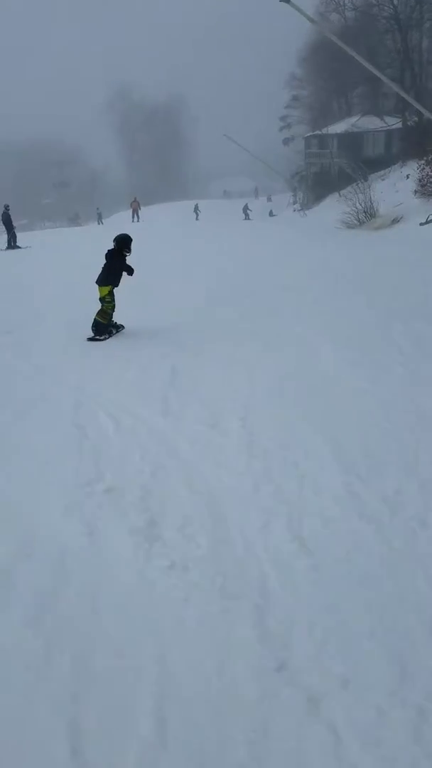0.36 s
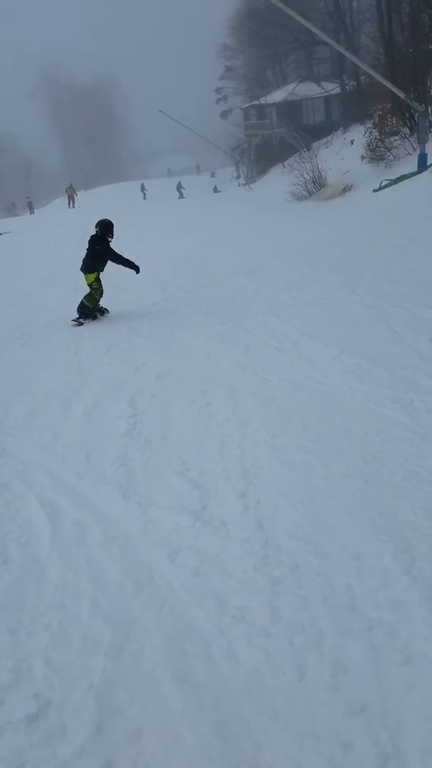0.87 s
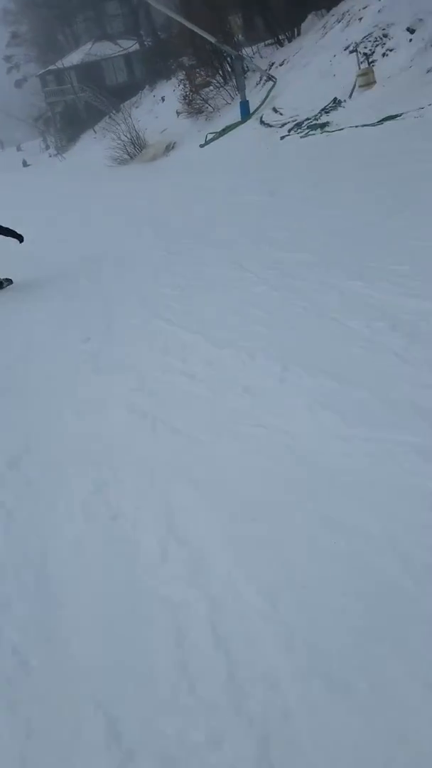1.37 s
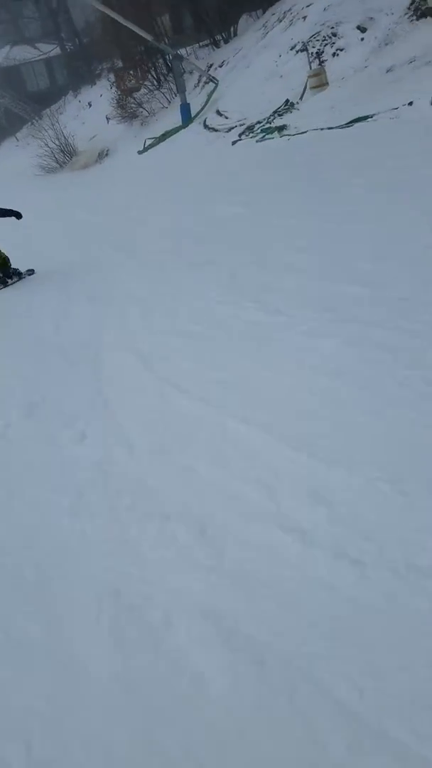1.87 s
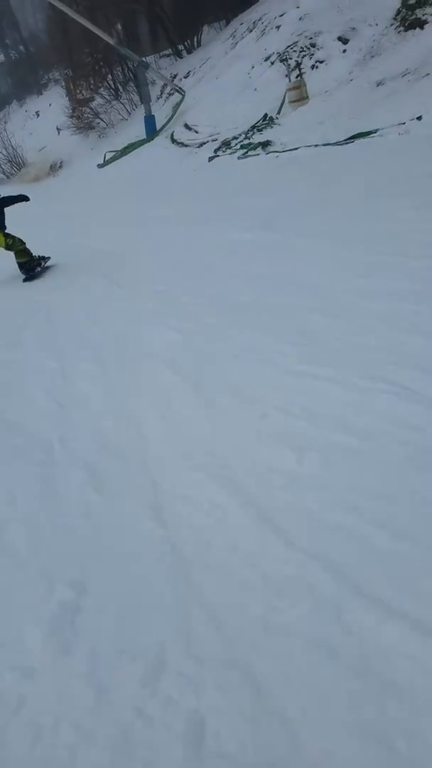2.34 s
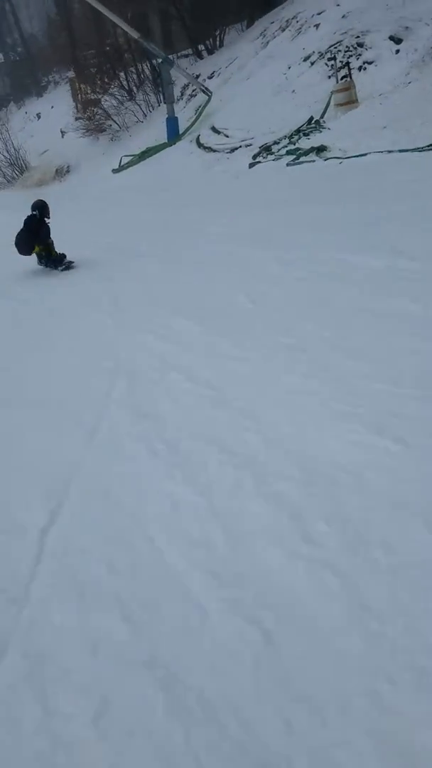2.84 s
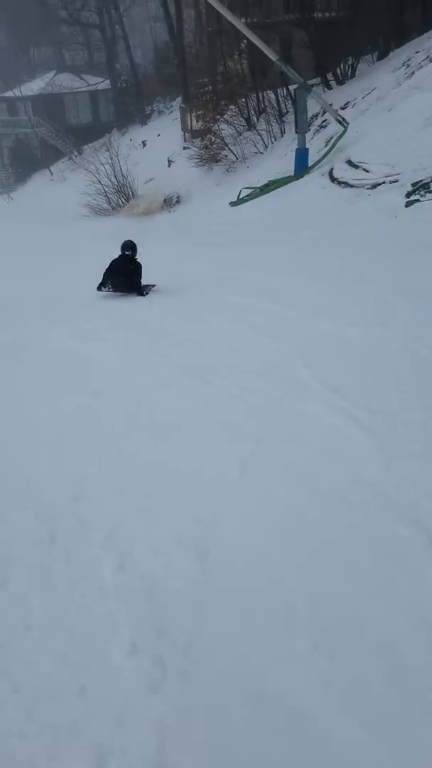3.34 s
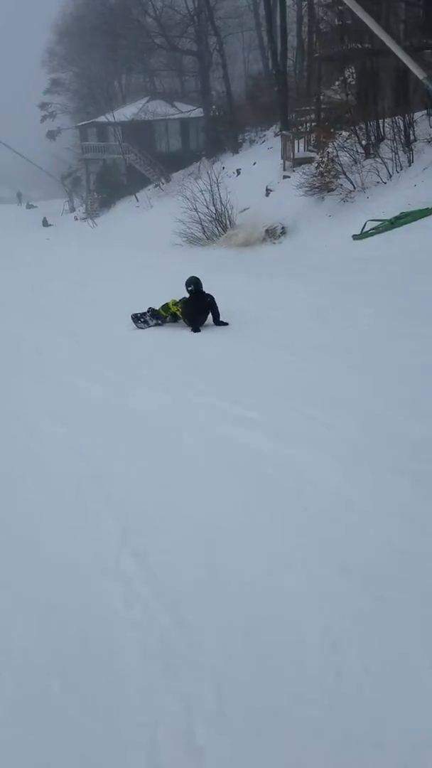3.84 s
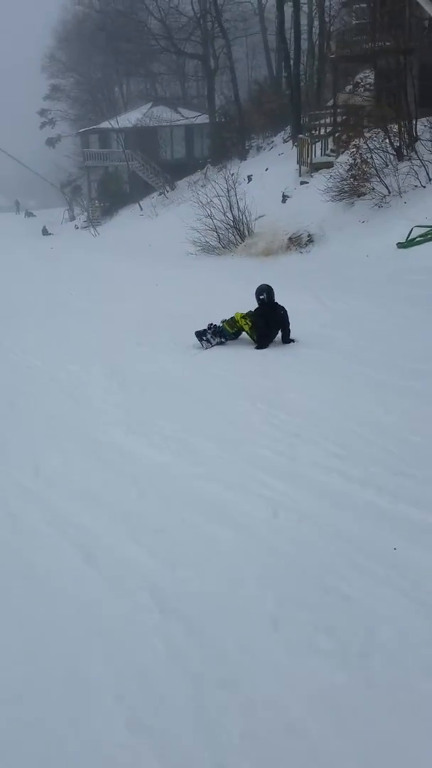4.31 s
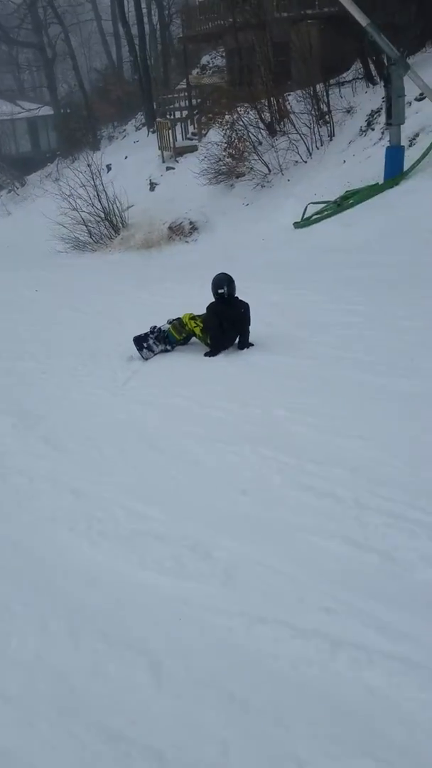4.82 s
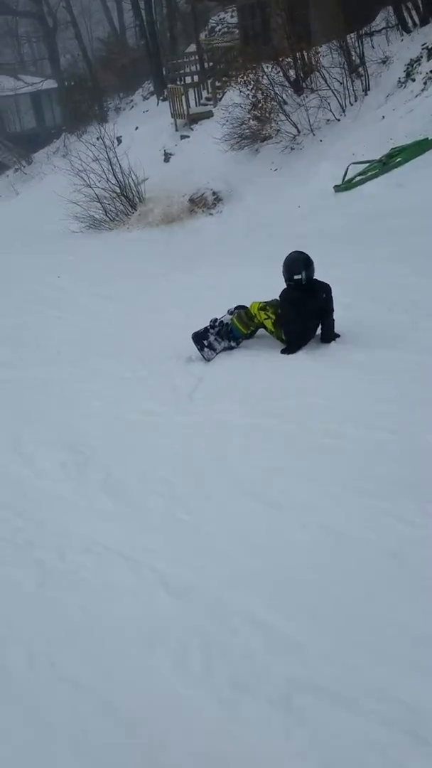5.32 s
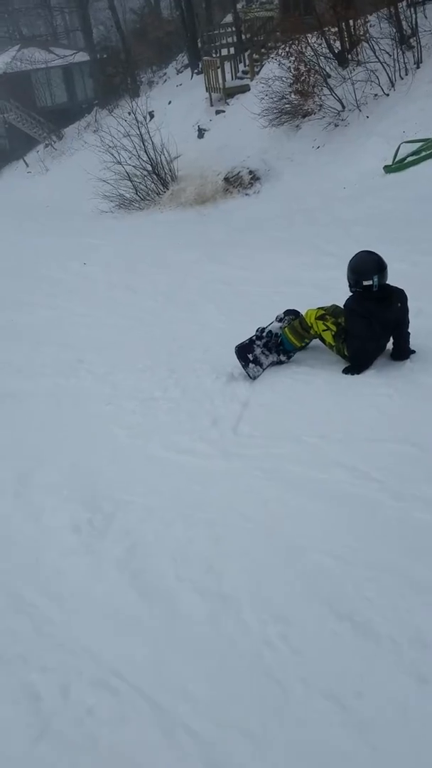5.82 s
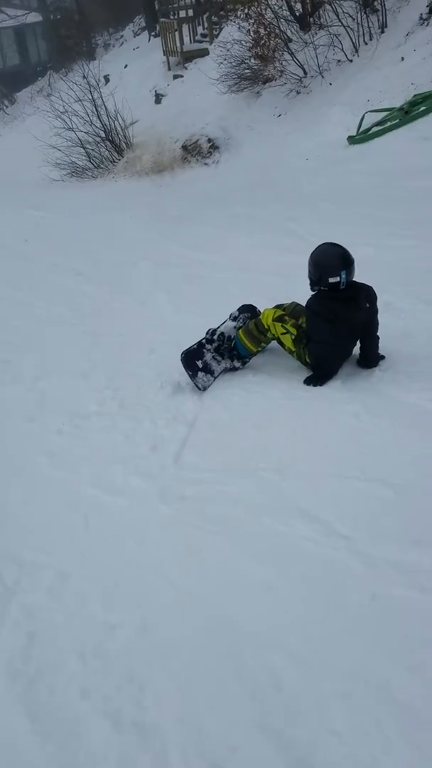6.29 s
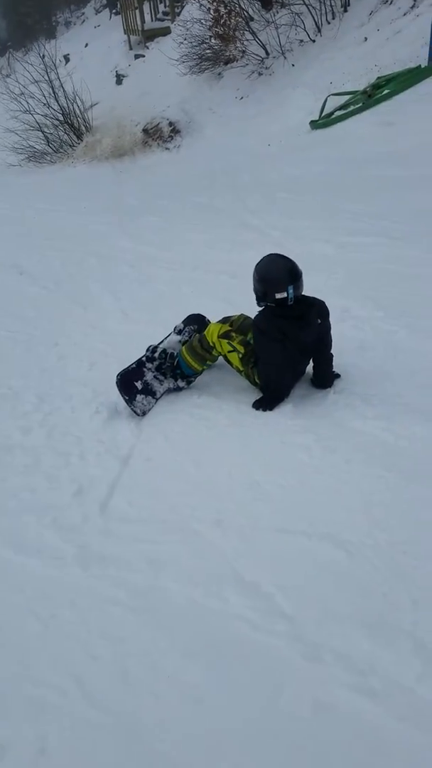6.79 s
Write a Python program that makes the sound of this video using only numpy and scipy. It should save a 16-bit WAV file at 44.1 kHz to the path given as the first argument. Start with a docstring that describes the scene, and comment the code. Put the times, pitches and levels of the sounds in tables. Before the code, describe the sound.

The first 0.4 seconds are silent, then the sound opens abruptly on a windy ski slope, heard close through a handheld phone's two microphones. Until about 1 second, strong low buffets thud and flutter, mostly on the right, over a thin bright hiss of snow under a board. The wind then recedes and the hiss gradually swells, grainy and uneven, with a tiny icy tick near 1.4. Small gusts puff around 2 to 2.4, and a stronger burst thumps around 2.8 to 3.2. Dull binding knocks land at about 3.5 and 3.7. More puffs come near 4.2 to 4.4 as the spray and rough edge scrape reach their fullest, around 4.4 to 4.8, with a hollow deck drone. From 5 seconds the board slows and the hiss softens, with wind nearly gone. Clustered padded knocks sound at 6.4 to 6.6, then faint ones near 6.8 to 6.9 over the dwindling scrape.

```python
"""After a short silence, wind buffets thud over the hiss of snow under a board gliding down a slope,
heard through the two ports of a phone in the rider's hand. The board is filtered noise shared by both
ports with frequency-dependent coherence and delay; the wind is turbulence unrelated between them.
Bindings knock in strokes of decaying modes, a longer knock being built of several overlapping strokes;
later the rider slows and the board runs calmer."""
import sys
import numpy as np
from scipy import signal
from scipy.fft import rfft, irfft, next_fast_len
from scipy.io import wavfile
from scipy.ndimage import uniform_filter1d

SR = 44100
rng = np.random.default_rng(int(sys.argv[2]) if len(sys.argv) > 2 else 0)


def ratio_of_db(decibels):
    """Turn decibels (scalar or array-like) into linear amplitude factors; 0 dB maps to 1."""
    return 10 ** (np.asarray(decibels, float) / 20)


def master_out(mix):
    """Clip the mix to full scale and print it as 16-bit PCM to the path in sys.argv[1]."""
    frames = np.transpose(np.atleast_2d(mix))
    ceiling = np.clip(frames, -1, 1)
    pcm = np.round(ceiling * 32767).astype(np.int16)
    wavfile.write(sys.argv[1], SR, pcm)


N = 305167  # length in samples
START_S = 0.364  # the microphone opens
LAG_S = 22 / 44100  # the left port is farther from the board
BUFFET_S = 0.0079  # from a buffet's peak to 1/e of its lift in dB

# Spray at the right port. Each row: time in seconds, level in dB.
SPRAY_LEVEL = [(.38, -39), (.46, -32), (.54, -28), (.68, -29.5), (.88, -27.5), (.97, -27.5), (1.11, -28.5),
               (1.17, -26), (1.23, -28.5), (1.31, -26), (1.39, -28.5), (1.47, -24.5), (1.53, -28.5),
               (1.6, -26), (1.72, -27), (1.81, -27), (1.87, -29), (2.0, -27), (2.07, -30), (2.16, -25.5),
               (2.29, -27), (2.39, -30), (2.46, -26.5), (2.53, -22), (2.61, -26.5), (2.72, -24),
               (2.87, -22.5), (2.97, -25), (3.06, -22.5), (3.23, -23.5), (3.3, -26), (3.4, -21.5),
               (3.49, -21), (3.74, -22.5), (4.15, -23), (4.32, -23), (4.41, -20), (4.58, -19.5),
               (4.8, -19.5), (5.1, -22), (5.27, -23.5), (5.42, -29.5), (5.7, -28.5), (5.83, -29.5),
               (6.15, -30), (6.3, -37.5), (6.42, -35.5), (6.54, -35.5), (6.6, -30), (6.67, -34.5),
               (6.76, -34), (6.87, -38.5)]
# Load on the board. Each row: time in seconds, edge scrape and deck drone, each in dB over the spray.
BOARD_LOAD = [(.41, -13, -11), (.6, -12.5, -19), (1.2, -12, -7), (1.45, -11, -18), (1.7, -9, -6),
              (2.1, -9, -3.5), (2.35, -5, -7), (2.9, -9, -8), (3.07, -6.5, -2.5), (3.45, -4, -7),
              (3.7, -5, -5), (4.15, 0.5, -1), (4.32, -4, -0.5), (4.47, -4.5, -8), (4.6, -2, -7.5),
              (5.0, -5, -3.5), (5.3, -4, -8.5), (5.8, -4.5, -3.5), (6.25, 0.5, 0.5), (6.4, -2.5, -1),
              (6.9, -1.5, -5)]
# Colours of spray, edge scrape and deck drone. Each row: frequency in Hz, relative density in dB per Hz.
SPRAY_COLOUR = [(1000, -25), (2000, -8.5), (3000, -8.5), (3300, -10), (4200, -12.5), (5000, -7),
                (6000, -5.5), (7000, -4), (8200, -2), (9500, -3), (11500, -10), (13000, -9), (15500, -11.5)]
EDGE_COLOUR = [(300, -19), (760, -0.5), (1100, 0.5), (1550, 0), (2000, -6), (3000, -5), (3300, -15.5),
               (5000, -11), (9000, -48)]
DECK_COLOUR = [(40, -13), (130, -32), (200, -21), (260, -3), (640, 0), (700, -1.5), (1000, -18),
               (2000, -23)]
# Deck resonance as the load shifts. Each row: time in seconds, centre in Hz, height of the peak in dB.
DECK_RESONANCE = [(.4, 414, 0), (4.5, 366, 7), (4.75, 575, -1), (4.95, 582, 12), (5.2, 570, 3.5),
                  (5.35, 570, 1), (5.65, 520, 5), (5.9, 590, 4), (6.2, 604, 1.5), (6.9, 630, 2.5)]
# Cavity resonance of the port as the phone turns. Each row: time in seconds, centre in Hz.
PORT_RESONANCE = [(.4, 8050), (2.4, 7870), (3.5, 8000), (4.8, 8500), (5.5, 8700), (6.9, 7950)]
# Braking: start and end in seconds.
BRAKING_S = (4.7, 6.2)
# Brief dips of the board's sound. Each row: time in seconds, depth in dB, half-width at 1/e in seconds.
BOARD_DIPS = [(1.572, 2, 0.011), (1.86, 1.5, .012), (1.899, 5, 0.012), (2.117, 1.5, 0.009),
              (2.222, 5, 0.025), (3.712, 3.5, 0.017)]
# Left port against the right. Each row: frequency in Hz, level in dB, likeness from 0 to 1 before
# the focus of the tilt, phase lead in radians.
PORT_TRANSFER = [(150, -2.5, 0.87, 0.018), (400, -2, 1, -0.2), (990, -4, 1, -0.2), (1470, -6, 0.78, 0.25),
                 (2080, -2, 1, 0.016), (2500, -3.5, 0.84, 0.41), (2940, -4.5, 0.9, 1), (3400, 6, 1, 1),
                 (3430, 2.5, 0.27, 0.13), (3930, -3, 0.83, -0.6), (4400, 0, 0.96, -0.41),
                 (5000, -2.5, 0.92, -0.2), (5130, -9.5, 0.25, -0.65), (6100, -6.5, 0.46, 0.011),
                 (8250, -3, 0.32, -1.2), (9150, -6, 0.37, 0.11), (12000, -4.5, 0.7, 0.11),
                 (15000, -9, 0.3, 0)]
# Turn of the phone to the board. Each row: time in seconds, extra treble lag of the left port round
# the case in ms, change of its treble level in dB.
PHONE_AIM = [(.4, 0.0097, -9.5), (1.0, .018, -5), (1.8, 0.0065, 0.5), (3.2, -0.0075, -2),
             (4.0, -0.021, -2.5), (4.8, -0.0084, -2), (6.9, -0.014, -1)]
# Tilt of the phone. Each row: time in seconds, extra lag of the left port in all bands in ms,
# dominance of one spot of the board from 0 to 1.
PHONE_TILT = [(.4, 0.006, 0.7), (.85, 0.017, 0.8), (.95, 0.002, 0.95), (1.1, 0.0016, 0.96),
              (1.35, -0.0032, 0.7), (1.6, -0.0059, 0.78), (2.2, 0.0038, 0.98), (3, 0.0061, 0.93),
              (4.5, -0.0011, 0.99), (4.8, -0.0097, 1), (5.2, .001, 1), (5.4, -.015, 0.86),
              (5.6, -0.011, 0.66), (6.1, -0.0081, 0.93), (6.3, -0.0049, 0.67), (6.5, -0.031, 0.8),
              (6.65, -0.025, 0.84), (6.84, -0.037, 0.5), (6.9, -0.021, .88)]
# Strokes of the binding knocks, a longer knock built of several overlapping strokes. Each row: time in
# seconds, peak in dB before the port gains, brightness in dB per octave.
KNOCK_STROKES = [(3.455, -10.5, 6), (3.738, -13.5, 12), (6.4012, -24.5, 17), (6.42, -11.5, 2),
                 (6.477, -31, 5), (6.516, -30, -2), (6.565, -18, 18), (6.568, -13, 0), (6.5701, -17, 12),
                 (6.604, -24, 12), (6.831, -22, 7), (6.907, -18, 15.5)]
# Modes of boot and binding. Each row: frequency in Hz, level in dB before the brightness, t60 in seconds.
BINDING_MODES = [(352, 8.5, 0.025), (457, 4.5, 0.021), (630, -4.5, 0.025), (1050, -18, 0.017),
                 (1680, -35, 0.018), (2360, -40, 0.012)]
# Ice crust under the edge. Each row: time in seconds, level in dB before the port gains,
# frequency in Hz, t60 in seconds.
ICE_TICKS = [(1.4355, -15.5, 776, 0.019)]
# Colours of the wind on the membranes and across the holes. Each row: frequency in Hz, gain in dB.
RUMBLE_COLOUR = [(10, -30), (30, -5), (70, 1), (130, 1.5), (200, -4.5), (350, -21), (700, -52)]
ROAR_COLOUR = [(80, -47), (200, -5), (340, 2), (480, -2.5), (750, -12.5), (1300, -26), (3000, -48)]
# Gusts on the exposed right port. Each row: time in seconds, rumble in dB before the buffets.
RIGHT_GUSTS = [(.41, -17), (.51, -15), (.61, -20), (.71, -14.5), (.77, -23.5), (.84, -18.5), (.92, -20.5),
               (1.01, -30), (1.31, -37.5), (1.41, -35.5), (1.55, -36.5), (1.81, -35), (2.1, -32.5),
               (2.3, -27), (2.7, -34), (3.05, -23.5), (3.31, -34), (3.63, -26), (3.83, -34.5),
               (4.15, -35.5), (4.45, -30), (4.85, -45), (5.3, -47), (5.65, -51.5), (6.05, -57), (6.45, -52),
               (6.9, -49)]
# Flow round the case. Each row: time in seconds, right roar in dB over its rumble, left rumble in dB,
# left roar in dB, the left ones before their flutter.
CASE_FLOW = [(.41, -5, -49, -54), (.66, -12, -31, -38), (.88, -7.5, -37, -40), (1.0, -11.5, -41, -38.5),
             (1.6, -2, -38, -39), (2.3, 3, -40.5, -32), (3.1, 4, -35.5, -29), (3.45, 0, -30.5, -27),
             (4.2, 9, -50, -38), (4.35, -3, -46, -38), (4.55, 12, -54, -27), (4.85, -2, -78, -55),
             (5.25, 9.5, -50, -44), (5.9, 5, -59, -53), (6.4, -10, -45, -59), (6.9, -8, -54, -44)]
# Buffets on the right port. Each row: time in seconds, lift of the roar in dB, lift of the rumble in dB,
# both before local evening.
RIGHT_BUFFETS = [(.374, 1, -2), (0.402, 12, 6), (0.416, 9, 17), (0.441, 14.5, 8), (.471, 11, 18),
                 (0.485, 11.5, 14), (0.503, 12.5, 13), (0.552, 5, 9), (0.561, 6, 8), (.592, 8, 6),
                 (.629, 5, 6), (0.659, 16, 13.5), (.7, 10, 9), (.721, -1, 5), (0.793, 2, 11),
                 (0.83, -1, 14), (.846, 0, 13), (0.867, 11, 11), (.877, 12, -4), (0.9, 22, 12.5),
                 (.94, 4, 8), (1.403, 10, 1), (1.474, 2, 7), (1.883, 12, 5), (2.111, 30, 5), (2.2, 7, 6),
                 (2.261, 12, 3), (2.311, -1, 5), (2.374, 10, 13), (2.827, 10, 4), (2.884, 13, -2),
                 (2.92, 18, 6), (2.947, 14, 0), (3.012, 7, 0), (3.029, 12, 6), (3.05, 5, 10),
                 (3.087, 17, 20), (3.123, 14, 14), (3.175, 6, 15), (3.642, 8, 5), (3.692, 13, 7),
                 (4.15, 9, 5), (4.187, 13, -6), (4.239, 12, 10), (4.38, 19, 7)]
# Band limits of the left and right ports in Hz.
PORT_LIMITS_HZ = (15250, 15800)


def evened(x):
    """Normalisation: equal mean power, rms 1, along the last axis."""
    return x / np.sqrt(np.mean(x ** 2, -1, keepdims=True) + 1e-20)


def read(points, hz):
    """Spectral interpolation: the columns of a table over log frequency."""
    f, *columns = np.transpose(points)
    return [np.interp(np.log(hz + 1), np.log(f + 1), c) for c in columns]


def curves(rows, t):
    """Linear interpolation: the columns of a table over time."""
    s, *columns = np.transpose(rows)
    return [np.interp(t, s, c) for c in columns]


def wander(shape, size):
    """Low-passed randomness: noise averaged twice over size points, rms 1."""
    return evened(uniform_filter1d(uniform_filter1d(rng.standard_normal(shape), size), size))


def board(patchy_db, chatter_db, deck_lumps_db):
    """Partial coherence: spray, scrape and drone add in power and reach both ports of the phone."""
    size, hop = 1024, 128
    frames, hz = N // hop + 5, np.fft.rfftfreq(size, 1 / SR)
    column_hz = hz[:, None]
    t = np.arange(frames) * hop / SR
    a, b, c, d, patches = rng.standard_normal((frames, len(hz), 5)).T
    patches = uniform_filter1d(uniform_filter1d(patches, size=16, axis=0), size=14, axis=1)
    patches = patches / patches.std()

    spray_db, (edge_db, deck_db) = curves(SPRAY_LEVEL, t)[0], curves(BOARD_LOAD, t)
    deck_db = deck_db + deck_lumps_db * wander(frames, size=8)  # the deck drums over ruts
    drone_hz, height_db = curves(DECK_RESONANCE, t)
    drone_db = height_db * np.exp(-((column_hz - drone_hz) / 70) ** 2)
    port_db = 3 * np.exp(-((column_hz - curves(PORT_RESONANCE, t)[0]) / 650) ** 2)
    power = 0
    layers = ((SPRAY_COLOUR, port_db, 0), (EDGE_COLOUR, 0, edge_db), (DECK_COLOUR, drone_db, deck_db))
    for colour, peak_db, over_db in layers:
        shape = ratio_of_db(read(colour, hz)[0][:, None] + peak_db)
        power = power + (evened(shape.T).T * ratio_of_db(spray_db + over_db)) ** 2

    moving = np.interp(t, BRAKING_S, [1, 0.4])
    chatter = chatter_db * moving * wander(frames, size=5)  # uneven snow shakes all bands at once
    # opposes the drone's peak just above it
    hollow_db = -0.7 * height_db * np.exp(-((column_hz - 1.32 * drone_hz) / 90) ** 2)
    level = np.sqrt(power) * ratio_of_db(hollow_db + patchy_db * patches + chatter)

    (lag_ms, shade_db), (tilt_ms, focus) = curves(PHONE_AIM, t), curves(PHONE_TILT, t)
    # tilting the phone slides the left port's shading along the spectrum
    left_db, same, ahead = read(PORT_TRANSFER, column_hz * (1 + 0.95 * tilt_ms / (1000 * LAG_S)))
    same = np.clip(same * focus, 0, 1)
    lag_s = LAG_S + np.clip((column_hz - 4500) / 3000, 0, 1) * lag_ms / 1000
    lag_s = lag_s + (tilt_ms + 0.0044 * wander(frames, size=16)) / 1000  # the hand shakes
    # the spray comes from shifting spots, so its phase across the ports wavers in patches
    phase = ahead + 0.28 * patches[::-1] - 2 * np.pi * column_hz * lag_s
    right = a + 1j * b
    left = same * np.exp(1j * phase) * right + np.sqrt(1 - same ** 2) * (c + 1j * d)
    left = left * ratio_of_db(left_db + shade_db * column_hz / (column_hz + 600))

    unit = signal.istft(right, nperseg=size, noverlap=size - hop)[1].std()
    spectra = level * np.array([left, right])
    sound = signal.istft(spectra, nperseg=size, noverlap=size - hop)[1][:, :N] / unit
    time = np.arange(N) / SR
    dip_db = sum(db * np.exp(-((time - s) / length) ** 2) for s, db, length in BOARD_DIPS)
    return sound * ratio_of_db(-dip_db)


def bindings():
    """Modal decay: strokes ring boot and binding, an ice crust ticks; the left port is later and softer."""
    t, out = np.arange(2600) / SR, np.zeros((2, N + 4000))
    lag = round(LAG_S * SR)
    strokes = []
    for s, db, bright_db in KNOCK_STROKES:
        ring = sum(ratio_of_db(mode_db + bright_db * np.log2(hz / 300) - 60 * t / t60) * np.sin(2 * np.pi * hz * t)
                   for hz, mode_db, t60 in BINDING_MODES)
        ring = ring * (1 - np.exp(-(t / 0.00052) ** 2))  # a padded blow builds gradually
        strokes.append((s, ratio_of_db(db) * ring / abs(ring).max()))
    for s, db, hz, t60 in ICE_TICKS:
        tick = ratio_of_db(db - 60 * t / t60) * np.minimum(t / 0.001, 1) * np.sin(2 * np.pi * hz * t)
        strokes.append((s, tick))
    for s, stroke in strokes:
        at = round(s * SR)
        out[1, at:at + len(t)] += ratio_of_db(4.5) * stroke
        out[0, at + lag:at + lag + len(t)] += ratio_of_db(1) * stroke
    # bodies this small push little bass
    return signal.sosfilt(signal.butter(4, 260, "high", fs=SR, output="sos"), out[:, :N])


def eddies(colour, lumps_db, pops_per_s, pop_db, steady):
    """Turbulence: lumpy noise and popping eddies, unrelated in the ports; steady (0-1) evens fading."""
    flow = rng.standard_normal((2, N)) * ratio_of_db(lumps_db * wander((2, N), size=500))
    chance, sign = rng.random((2, N)), rng.choice([-1, 1], (2, N))
    big = rng.exponential(1, (2, N))
    pops = (chance < pops_per_s / SR) * sign * ratio_of_db(7.0 * np.minimum(big, 4))
    drive = evened(flow) + ratio_of_db(pop_db) * evened(pops)
    size = next_fast_len(N)
    gain = ratio_of_db(read(colour, np.fft.rfftfreq(size, 1 / SR))[0])
    sound = evened(irfft(rfft(drive, size) * gain, size)[:, :N])
    swing = np.sqrt(abs(uniform_filter1d(sound ** 2, size=450, axis=1)) + 0.05)
    return evened(sound / swing ** steady)


def wind():
    """Flow noise: low rumble on the membranes, higher roar across the holes, buffets on the right port."""
    t = np.arange(N) / SR
    gust_db, (over_db, rumble_db, roar_db) = curves(RIGHT_GUSTS, t)[0], curves(CASE_FLOW, t)
    # rows: left rumble, right rumble, left roar, right roar
    level = ratio_of_db(np.array([rumble_db, gust_db, roar_db, gust_db + over_db]))
    level[::2] *= ratio_of_db(1.9 * wander(N, size=3000))  # the sheltered left port flutters on its own
    coarse = t[::16]
    lift_db = sum(np.outer([low_db, db], np.exp(-((coarse - s) / BUFFET_S) ** 2))
                  for s, db, low_db in RIGHT_BUFFETS)
    lift = ratio_of_db(np.array([np.interp(t, coarse, row) for row in lift_db]))
    # buffets bunch the energy without raising its local mean
    level[1::2] *= lift / np.sqrt(uniform_filter1d(lift ** 2, size=5000, axis=1))

    rumble = eddies(RUMBLE_COLOUR, lumps_db=1.5, pops_per_s=55, pop_db=-7.5, steady=0.59)
    deep = signal.sosfiltfilt(signal.butter(2, 120, fs=SR, output="sos"), rumble)
    # fast flow sheds smaller eddies: the rumble rises in pitch
    fast = np.clip((np.array([rumble_db, gust_db]) + 32.5) / 12, 0, 1)
    rumble = rumble + fast * (0.46 * rumble - 0.89 * deep)
    roar = eddies(ROAR_COLOUR, lumps_db=3.0, pops_per_s=120, pop_db=-3.0, steady=0.3)
    return level[:2] * rumble + level[2:] * roar


def scene():
    """Superposition: board, wind and bindings add at the two ports."""
    return board(patchy_db=0.94, chatter_db=0.71, deck_lumps_db=1.0) + wind() + bindings()


def top_cut(x):
    """Nothing passes above the cut-off."""
    return signal.sosfilt(signal.butter(12, 17010, fs=SR, output="sos"), x)


def record(dry):
    """Transducer limits: vented bass, soft saturation, opening after a silence, a band limit per port."""
    opened = np.clip((np.arange(N) / SR - START_S) / 0.0046, 0, 1)
    # the capsule vents deep bass
    thinned = signal.sosfilt(signal.butter(2, 56, "high", fs=SR, output="sos"), dry)
    squeezed = 0.75 * np.tanh(thinned / 0.75)  # the hardest buffets round off
    taps = np.array([signal.firwin(511, hz, window=("kaiser", 9), fs=SR) for hz in PORT_LIMITS_HZ])
    mix = signal.oaconvolve(squeezed * opened, taps, "same", axes=1)
    return top_cut(mix)


dry = scene()
out = record(dry)
master_out(out)
```